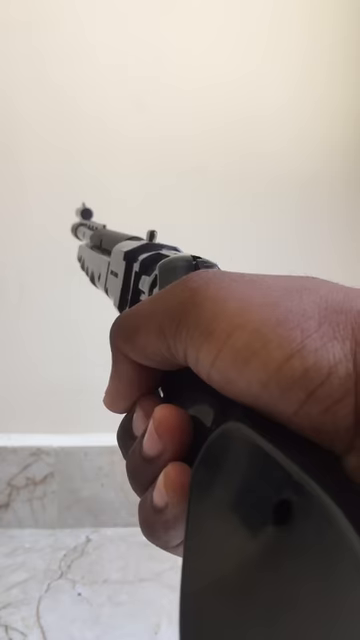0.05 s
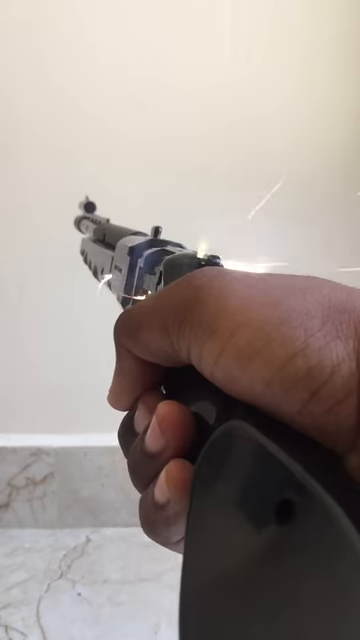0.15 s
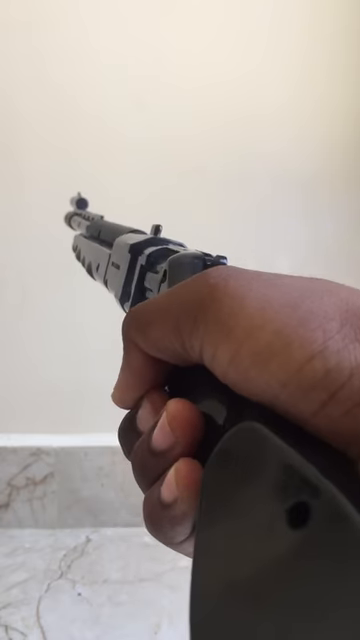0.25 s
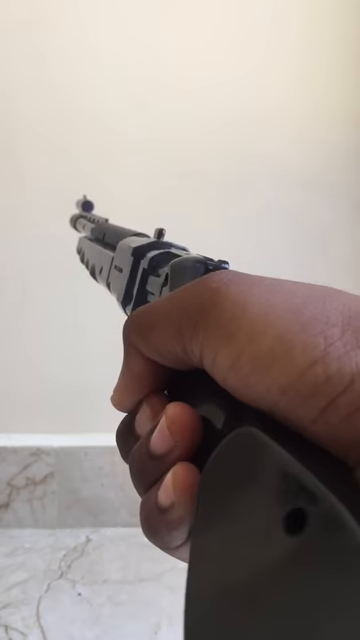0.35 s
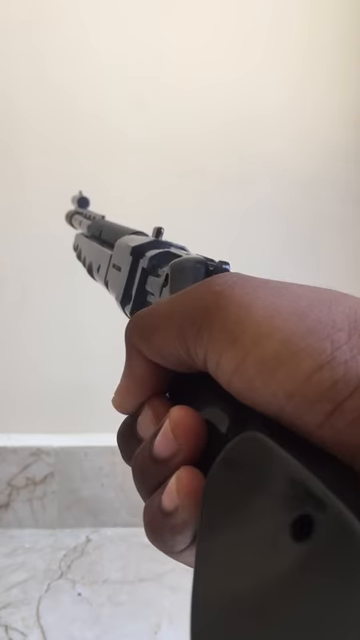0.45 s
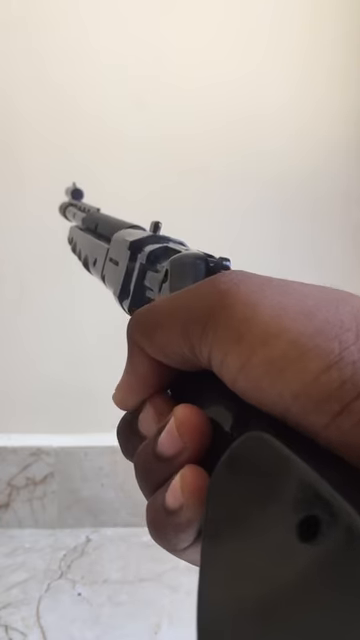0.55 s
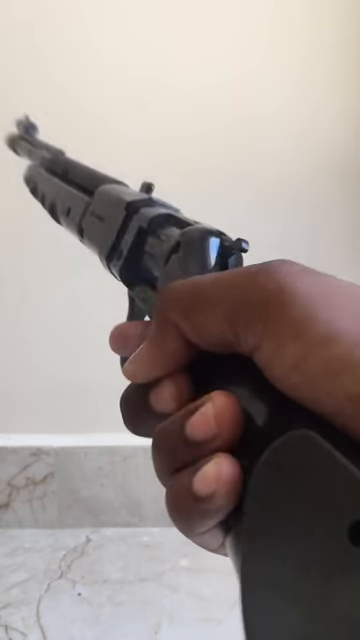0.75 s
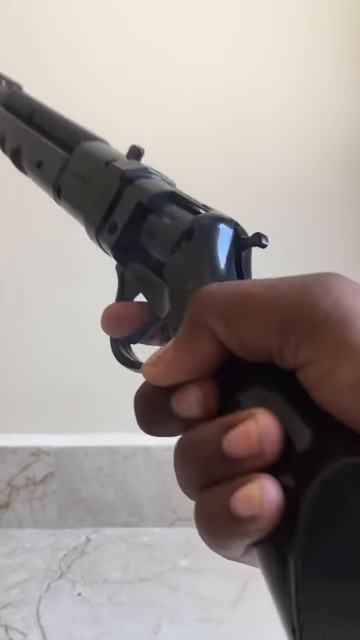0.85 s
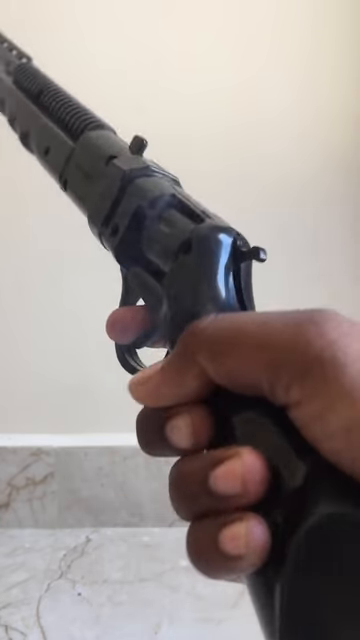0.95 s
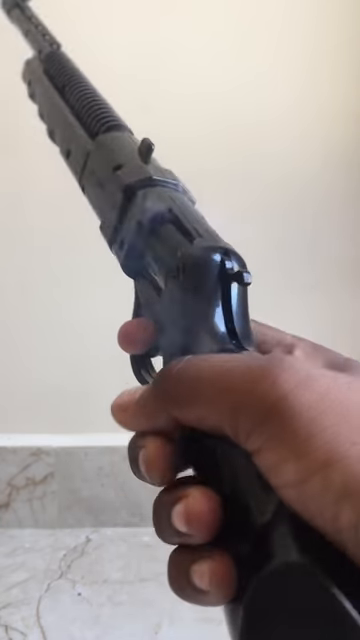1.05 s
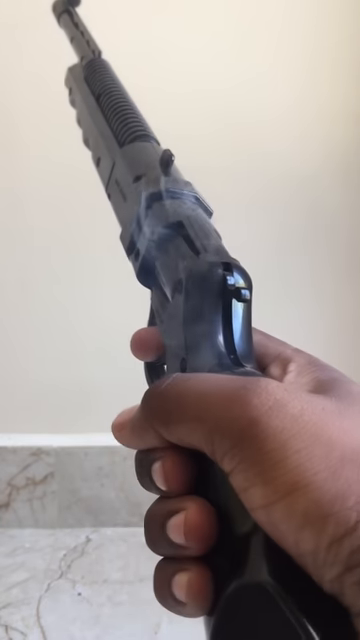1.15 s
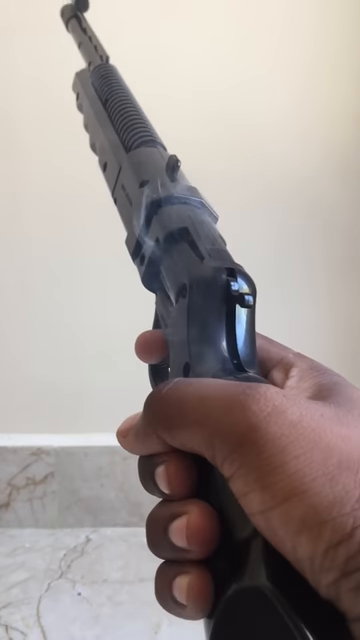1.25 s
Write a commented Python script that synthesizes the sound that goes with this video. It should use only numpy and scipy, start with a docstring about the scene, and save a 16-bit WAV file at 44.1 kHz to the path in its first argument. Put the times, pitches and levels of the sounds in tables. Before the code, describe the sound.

A toy cap gun fires one sharp, loud bang that rings in a bare room.

```python
"""A toy cap gun is fired close to the microphone in a bare, hard room.
Over a low hum, a hand shifts on the grip and the trigger ticks and rubs. The spring lets go and
shakes the plastic body, then the cap cracks, overloading the recorder. Gain control ducks the
ringing room and creeps back. The trigger clacks home, the hum swells as the gun is raised,
and a few faint ticks follow."""
import sys
import numpy as np
from scipy import signal
from scipy.fft import rfft, irfft
from scipy.io import wavfile

SR = 44100
rng = np.random.default_rng(int(sys.argv[2]) if len(sys.argv) > 2 else 0)


def generate_wav(signal):
    """Clip the signal to [-1, 1] and save it as 16-bit WAV at the path in sys.argv[1]."""
    frames = np.transpose(np.atleast_2d(signal))
    scaled = np.clip(frames, -1, 1) * 32767
    pcm = np.round(scaled).astype(np.int16)
    wavfile.write(sys.argv[1], SR, pcm)


N = 57330
TIME = np.arange(N) / SR
RELEASE_S, FIRE_S = .2185, .2401  # cues: the spring lets go, the cap fires


def amp(db):
    return 10 ** (np.asarray(db) / 20)


def unit_rms(x):
    return x / np.sqrt(np.mean(x ** 2) + 1e-20)


def curve_at(points, hz):
    """Reads a table on a log-frequency axis."""
    f, value = np.transpose(points)
    return np.interp(np.log(hz + 1), np.log(f + 1), value)


def noise(colour):
    """Noise of rms one, shaped by an EQ curve."""
    eq = amp(curve_at(colour, np.fft.rfftfreq(N, 1 / SR)))
    return unit_rms(irfft(rfft(rng.standard_normal(N)) * eq, N))


def since(s):
    """Seconds since s, zero before it."""
    return np.maximum(TIME - s, 0)


def ramp(s, length_s):
    return np.clip(since(s) / length_s, 0, 1)


def fade(t, t60):
    """Falls by 60 dB in t60."""
    return np.exp(-np.log(1000) * t / t60)


def burst(s, decay):
    """A hard attack at s and an exponential fall."""
    return (TIME >= s) * np.exp(-since(s) / decay)


def ring(modes, s):
    """Damped sines struck together at s."""
    t = since(s)
    return sum(amp(db) * fade(t, t60) * np.sin(2 * np.pi * hz * t) for hz, db, t60 in modes)


# EQ of the room's steady air: f/Hz, level/dB
AIR_EQ = [(20, -35), (45, -8.5), (70, 4), (110, 6), (200, -3), (300, -9), (420, -21.5), (1000, -20.5),
          (2000, -21.5), (4000, -32.5), (5500, -41.5), (9000, -50.5), (16000, -54.5)]

def room_tone():
    """A bed of room noise, and a low hum that swells as the gun is raised."""
    hum_hz, hum_db, swell_db = 60.4, -45.5, 5.5
    raised = ramp(.747, length_s=.031)
    hum = unit_rms(np.sin(2 * np.pi * (hum_hz * TIME + rng.random())))
    return amp(hum_db + swell_db * raised) * hum + amp(-44) * noise(AIR_EQ)


# EQ of the hand shifting on the grip: f/Hz, level/dB
GRIP_EQ = [(30, -22.5), (100, -1.5), (290, 1.5), (400, -16.5), (520, -6), (720, -25), (1000, -9.5),
           (1400, -37.5), (16000, -69)]
# EQ of the trigger's friction: f/Hz, level/dB
RUB_EQ = [(200, -16), (700, -10), (1600, 8.5), (3000, -2), (6000, -12), (10000, -19.5), (16000, -36.5)]

def hand():
    """The hand shifts on the grip and the squeezed trigger rubs until the spring lets go."""
    grip = amp(-50) * noise(GRIP_EQ)
    rub = amp(-51.5) * ramp(.11, length_s=.06) * noise(RUB_EQ)
    return (grip + rub) * fade(since(RELEASE_S), t60=.1)


# Reverb time of the bare room: f/Hz, t60/s
ROOM_DECAY = [(100, .45), (400, 0.76), (1200, 0.88), (2500, 0.97), (5000, 0.82), (9000, 0.72),
              (16000, 0.37)]

def room_tail(x, start):
    """From start on, each band dies at the room's own speed."""
    hz, t, bands = signal.stft(x, SR, nperseg=256, noverlap=192)
    bands = bands * fade(np.maximum(t - start, 0), curve_at(ROOM_DECAY, hz)[:, None])
    return signal.istft(bands, SR, nperseg=256, noverlap=192)[1][:N]


# Cue list of the mechanism's clicks:
# t/s, snap level/dB, snap decay/s, snap centre f/Hz, snap width/octaves, ring level/dB, reverb send/dB
CLICK_CUES = [(0.0972, -52.5, .002, 2030, 0.2, -45, 1), (0.1387, -43.5, 0.0018, 4450, 1.2, -37.5, 7),
              (.1440, -28.5, 0.0028, 3500, 1.15, -39, -14), (0.218, -21, 0.0024, 3600, 0.83, -53, 1),
              (0.6714, -9, 0.0019, 3230, 1.5, -0.5, -15), (1.037, -68, 0.0031, 8540, .5, -57, -5),
              (1.11, -77, 0.0017, 7200, .3, -46, -9), (1.1633, -37.5, 0.002, 3600, .4, -40, -12)]
# Modes of the plastic shell: f/Hz, level/dB, t60/s
SHELL_MODES = [(1494, -0.5, 0.019), (1290, -18, 0.01449), (1850, -6, .022), (2820, -12, 0.028),
               (3030, -15, .03), (4227, -31.5, 0.015)]

def mechanism():
    """Each click is a short snap that rings the plastic shell, too small for bass; the room answers."""
    low_cut_hz, wall_delay_s = 937, .0079
    low_cut = signal.butter(4, low_cut_hz, "high", fs=SR, output="sos")
    reverb = room_tail(rng.standard_normal(N), 0) * (TIME > wall_delay_s)
    reverb /= np.linalg.norm(reverb)
    out, freqs = np.zeros(N), np.geomspace(50, 18000, 40)
    for s, snap_db, decay, centre_hz, octaves, ring_db, send_db in CLICK_CUES:
        bell_db = -30 * np.log10(1 + (np.log2(freqs / centre_hz) / octaves) ** 2)
        snap = amp(snap_db) * burst(s, decay) * noise(np.c_[freqs, bell_db])
        click = signal.sosfilt(low_cut, snap + amp(ring_db) * ring(SHELL_MODES, s))
        out += click + amp(send_db) * signal.fftconvolve(click, reverb)[:N]
    return out


# EQ of the spring's slide up to the cap: f/Hz, level/dB
SCRAPE_EQ = [(100, -7.5), (320, -1), (520, -10.5), (1200, -3.5), (3000, -13.5), (4500, -30.5), (9000, -41),
             (16000, -46)]
# Hits of the spring on the gun's body: t/s, level/dB
SPRING_HITS = [(0.2273, -9), (0.2334, -1.5)]
# Low modes of the hollow body: f/Hz, level/dB, attack/s, t60/s
BODY_MODES = [(311.7, 6.5, 0.0021, .08), (364.8, 3.5, 0.0032, 0.088), (216.5, 3, 0.0032, 0.11),
              (129.3, 9, 0.014, 0.11)]

def spring():
    """The freed spring scrapes ever louder towards the cap and thumps the hollow body."""
    start_db, rise_db = -25, 25
    travel = ramp(RELEASE_S, FIRE_S - RELEASE_S)
    crescendo = (TIME > RELEASE_S) * amp(start_db + rise_db * travel)
    out = crescendo * fade(since(FIRE_S), t60=.12) * noise(SCRAPE_EQ)
    for s, hit_db in SPRING_HITS:
        t = since(s)
        for hz, db, attack, t60 in BODY_MODES:
            envelope = (1 - np.exp(-t / attack)) * fade(t, t60)
            out += amp(hit_db + db) * envelope * np.sin(2 * np.pi * hz * t)
    return out


# EQ of the cap's dry crack: f/Hz, level/dB
CRACK_EQ = [(60, -11), (300, -8), (1000, -9), (2500, 0), (5000, -8.5), (9000, -16), (16000, -19)]
# EQ of the room's answer to the cap: f/Hz, level/dB
REFLECTION_EQ = [(60, -18.5), (270, -26.5), (400, -11.5), (700, -9.5), (1200, -5.5), (2000, -1.5),
                 (2800, 0.5), (4500, -5), (6500, -5), (9000, -12), (12000, -18.5), (16000, -21.5)]

def cap():
    """A crack, a few slow swings of recoil, dense early reflections and the long ring of the room."""
    crack = amp(15.5) * burst(FIRE_S, decay=.006) * noise(CRACK_EQ)
    recoil_s, recoil_hz, rise_s, width_s = .2455, 56.1, .014, .011
    t = since(recoil_s)
    recoil = amp(3.5) * np.exp(-((t - rise_s) / width_s) ** 2) * np.sin(2 * np.pi * recoil_hz * t)
    early = fade(since(FIRE_S), t60=.23) * noise(REFLECTION_EQ)
    late = amp(4) * room_tail(noise(REFLECTION_EQ), FIRE_S)
    return crack + recoil + (TIME >= FIRE_S) * (early + late)


# Low standing waves of the room: f/Hz, level/dB, t60/s
ROOM_MODES = [(136, -22.5, 0.51), (183, -29, .7), (418, -22.5, 0.94), (648.3, -16.5, .6), (59.4, -22, 0.79)]

def standing_waves():
    """The bang leaves a few low notes hanging between the walls."""
    return ring(ROOM_MODES, FIRE_S)


def scene():
    """The mono mix at the microphone."""
    return (room_tone() + hand() + mechanism() + spring() + cap() + standing_waves())[None]


def ducking(x, threshold_db, duck_db_per_s, hold_s, recover_db_per_s, hop=64):
    """Decibels of gain reduction: grows steadily while the sound is loud, holds, then shrinks again."""
    t = TIME[::hop]
    power = signal.lfilter(np.ones(hop * 4) / (hop * 4), 1, x ** 2)[::hop]
    level_db = 10 * np.log10(abs(power) + 1e-12)
    loud = .5 + .5 * np.tanh(level_db - threshold_db)  # soft knee
    quiet_s = t - np.maximum.accumulate(t * (loud > .5))
    recovering = np.clip((quiet_s - hold_s) / .01, 0, 1)
    total_db = np.cumsum(loud * duck_db_per_s - recovering * recover_db_per_s) * hop / SR
    return np.interp(TIME, t, total_db - np.minimum.accumulate(total_db))  # recovery stops at unity gain


# Gain control, short hold then long hold: threshold/dB, ducking/(dB/s), hold/s, recovery/(dB/s)
DUCK_STAGES = [(-8, 34, 0.005, 36), (-6, 98.5, 0.41, 40.5)]

def record(dry):
    """Gain control too slow for the crack, hard clipping, then a high cut."""
    ceiling, high_cut_hz = .89, 15950
    gain = amp(-sum(ducking(dry[0], *stage) for stage in DUCK_STAGES))
    clipped = np.clip(dry * gain, -ceiling, ceiling)
    high_cut = signal.firwin(255, high_cut_hz, window=("kaiser", 8), fs=SR)
    return signal.oaconvolve(clipped, high_cut[None], "same")


dry = scene()
out = record(dry)
generate_wav(out)
```